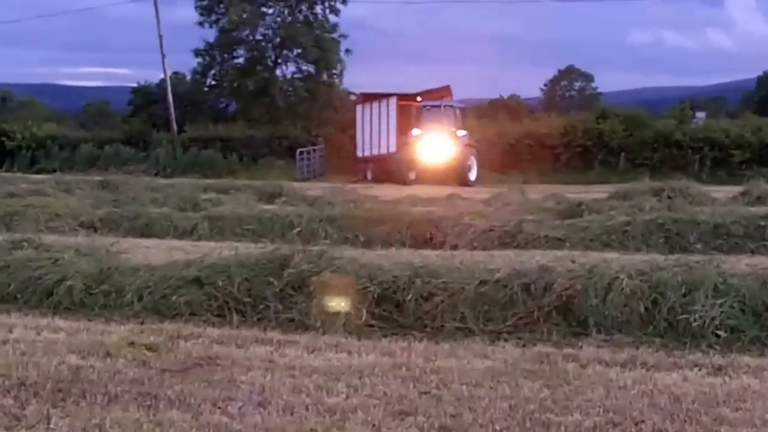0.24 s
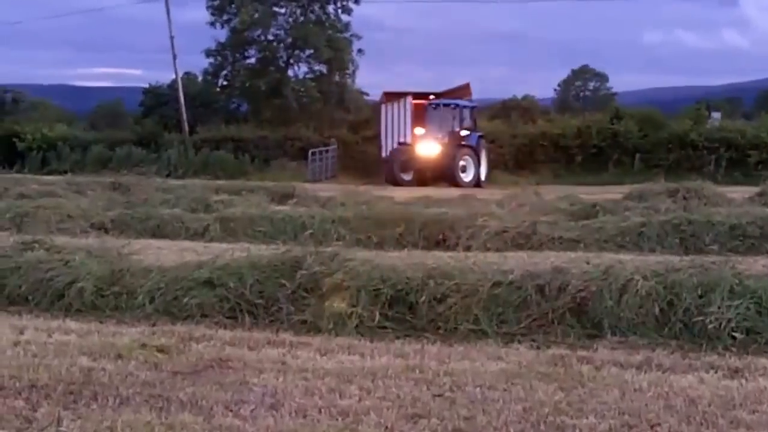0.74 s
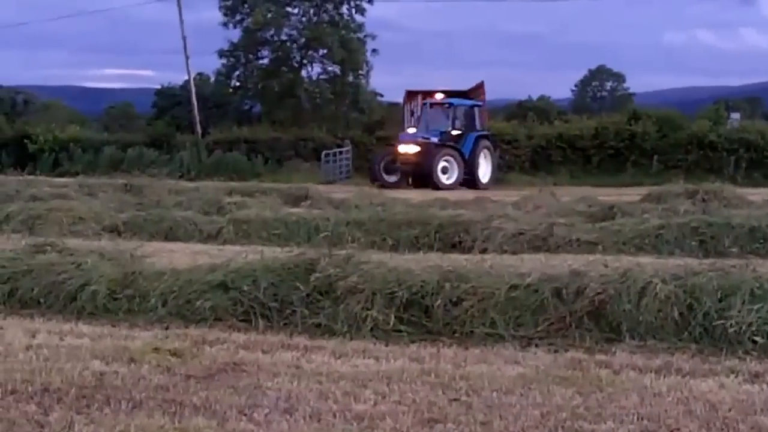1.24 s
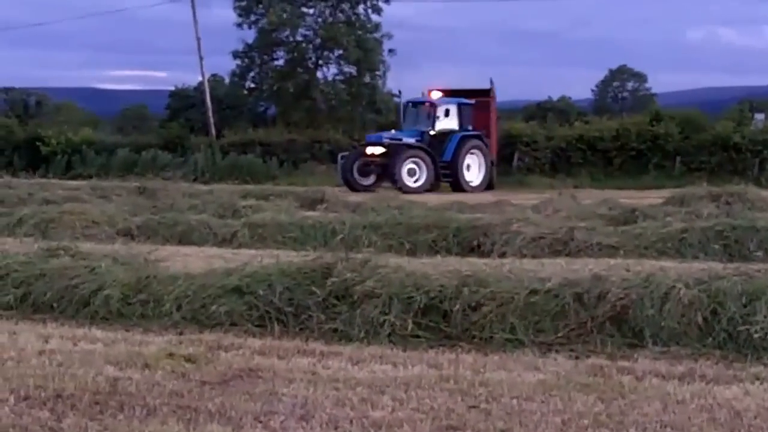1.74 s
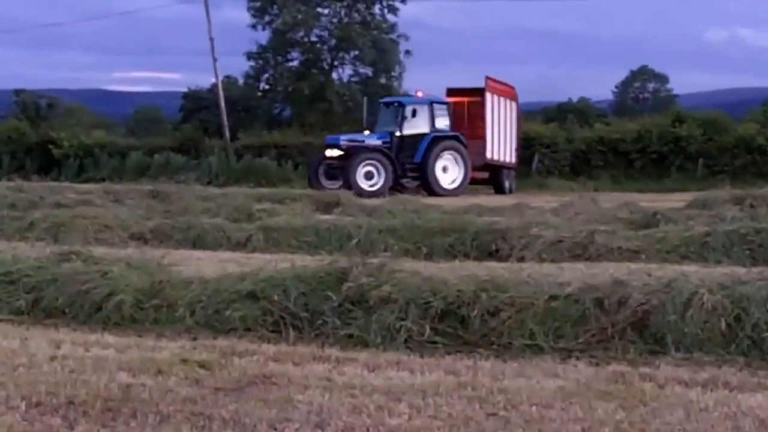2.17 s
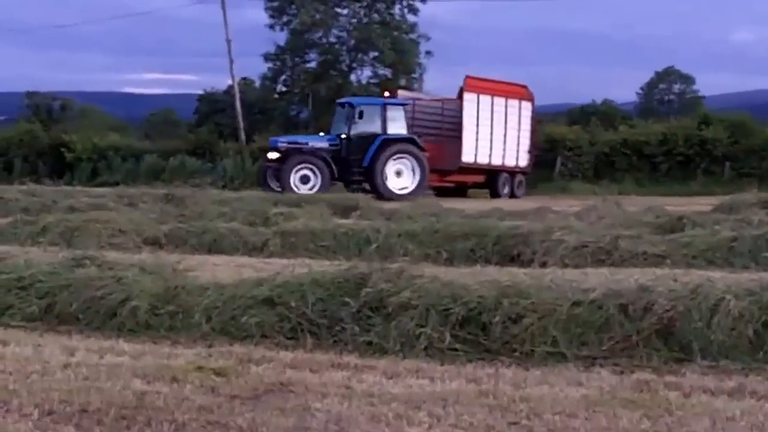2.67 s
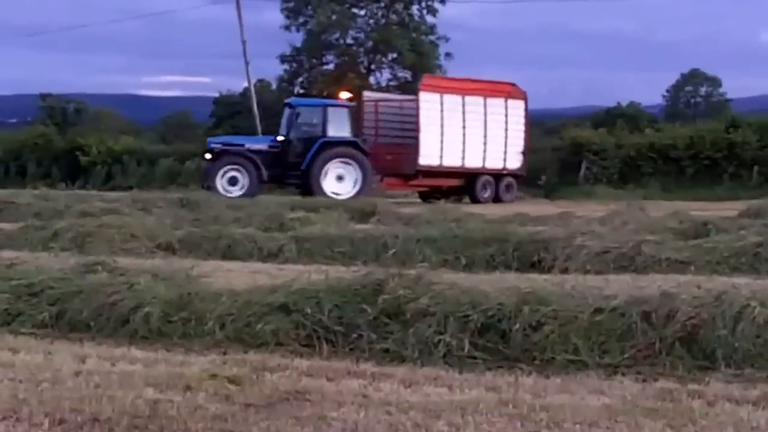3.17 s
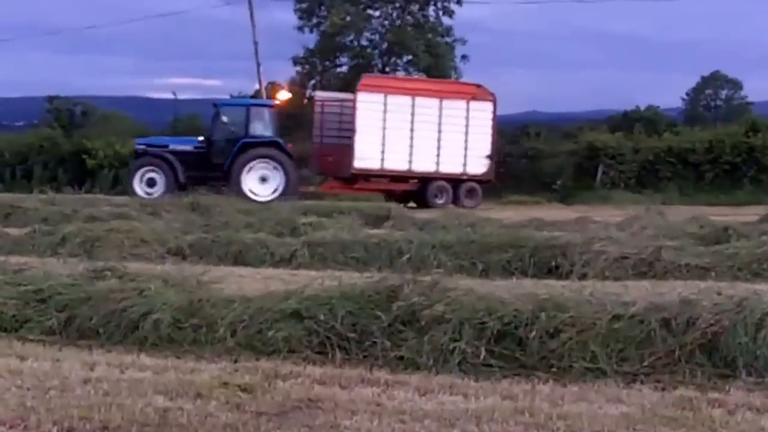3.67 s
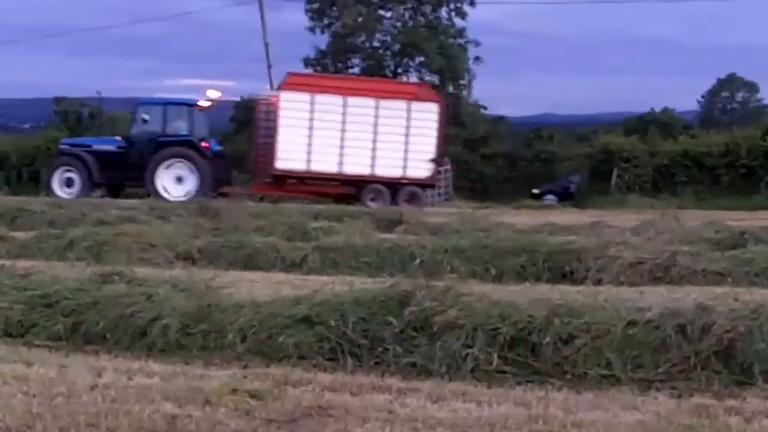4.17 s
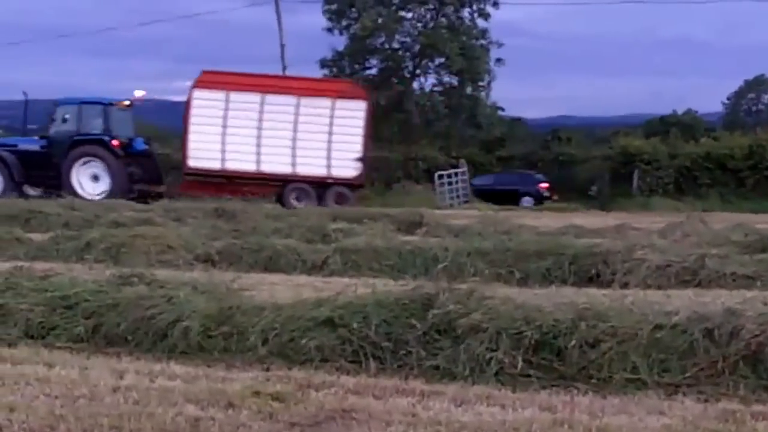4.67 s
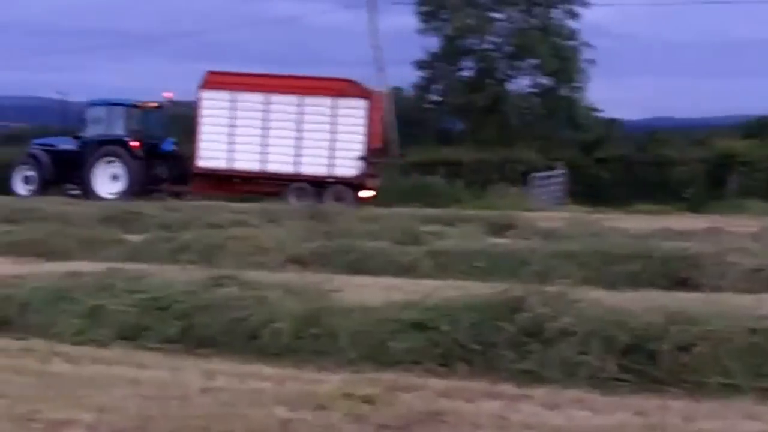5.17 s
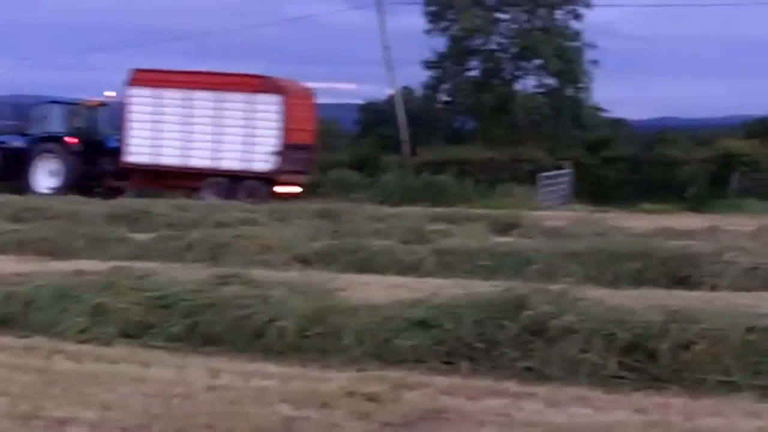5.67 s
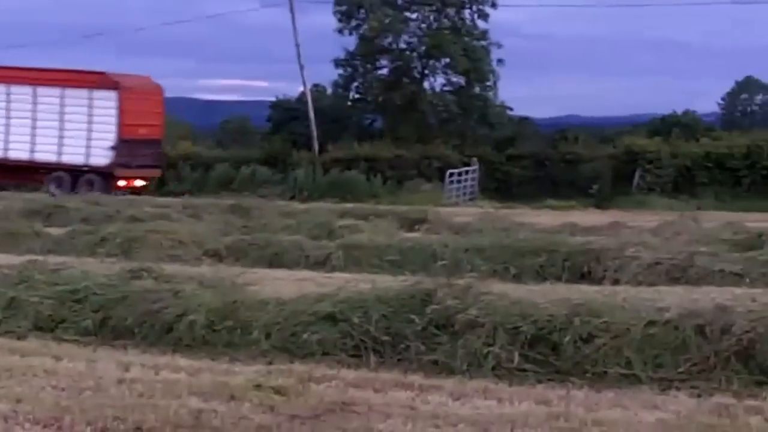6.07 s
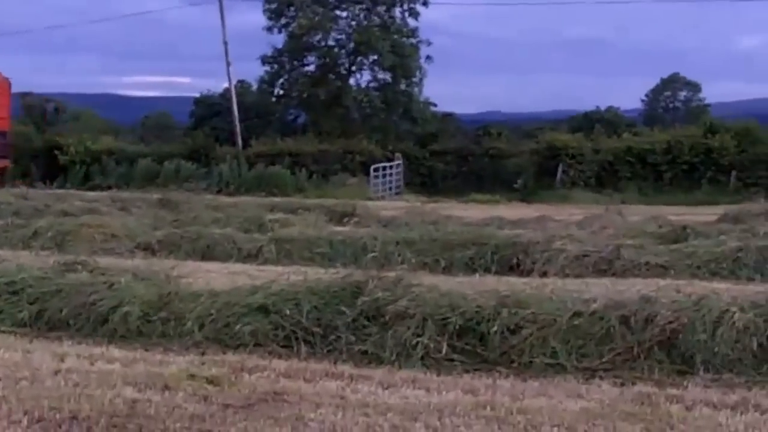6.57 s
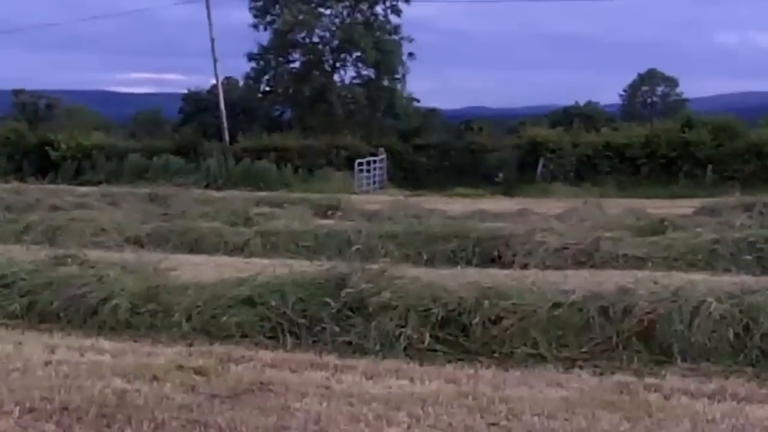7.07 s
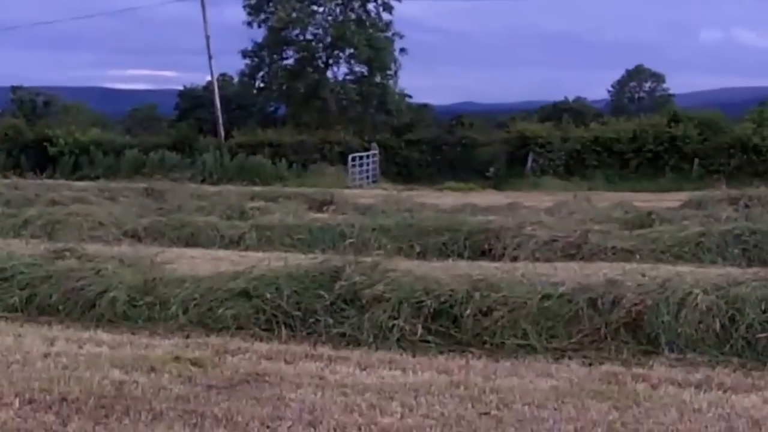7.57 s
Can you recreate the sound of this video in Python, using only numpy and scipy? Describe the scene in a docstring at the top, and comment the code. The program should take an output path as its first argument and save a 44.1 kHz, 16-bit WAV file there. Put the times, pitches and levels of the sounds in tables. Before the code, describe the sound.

A diesel tractor drives across an open field, humming and knocking as its engine speed climbs. Its empty trailer gives a few bangs and brief squeaks at first, then crashes and rattles over ruts midway and again near the end, as the engine eases into the distance. A breeze buffets the microphone throughout, with low pops and booms.

```python
"""A mown field: a six-cylinder diesel tractor turns, speeds up and pulls an empty silage trailer away.
The exhaust hums on the firing rate while the block roars and knocks. Ruts set the trailer crashing
and rattling, and its running gear squeaks. A breeze buffets the microphone, eddies pop on it, and
low booms come with some gusts and ruts. One capsule feeds both channels."""
import sys
import numpy as np
from scipy import signal
from scipy.fft import rfft, irfft, next_fast_len
from scipy.io import wavfile

SR = 44100
rng = np.random.default_rng(int(sys.argv[2]) if len(sys.argv) > 2 else 0)


def file_out(sig):
    """Save sig as 16-bit WAV at sys.argv[1]."""
    # one column per channel
    cols = np.atleast_2d(sig).T
    # limit, then scale
    lim = np.clip(cols, -1, 1)
    pcm = np.round(lim * 32767).astype(np.int16)
    wavfile.write(sys.argv[1], SR, pcm)


N = 345303

# engine speed: time_s, firing_rate_hz
ENGINE_SPEED = [(0, 40.2), (.9, 46.4), (1.5, 53.5), (2.1, 63), (2.4, 67.1), (2.7, 69.8), (3.0, 71.2),
                (3.3, 71.5), (3.9, 73.8), (4.8, 78.9), (6.3, 86.2), (7.2, 90.9), (7.83, 92.1)]
# exhaust hum as the pipe turns past and away: time_s, fundamental_db, second_db, upper_orders_db
EXHAUST_HUM = [(0, -28, -45, -54), (.6, -26, -44, -51), (1.2, -25.5, -45, -43), (2.1, -26, -48, -47),
               (2.45, -28, -45, -44), (2.85, -31, -30, -39), (3.35, -31, -29, -41), (3.85, -30, -40, -51),
               (4.05, -33, -37, -48), (4.2, -33, -33, -48), (4.35, -30, -27.5, -44), (4.55, -33, -28, -46),
               (4.68, -34, -25, -45), (4.83, -35, -27, -45), (4.92, -34, -32, -48), (5.3, -34, -33, -50),
               (5.5, -37, -39, -47), (6.3, -38, -48, -48), (6.9, -54, -52, -52), (7.83, -42, -48, -53)]
# overtones on top of the hum: firing_rate_multiple, trim_db
EXHAUST_OVERTONES = [(2.5, 3.5), (3, -2)]
# punch of each firing in one engine cycle: strength_db
CYLINDER_PUNCH = [5, 1, 7, 5.5, 9, 4]
# roar of block and driveline: time_s, level_db, treble_tilt_db_per_octave
ROAR_RIDE = [(0, -42.5, 3), (.65, -38, 2), (1.3, -42, 5), (1.7, -35.5, 2.5), (2.1, -38.5, 3),
             (2.6, -35.5, 2), (2.9, -38, 1.5), (3.5, -36, 1.5), (4.2, -35.5, 2), (4.7, -36.5, 3),
             (5.1, -38, 1.5), (5.5, -36, 2), (6.3, -38, 1), (6.7, -41.5, 1), (7.3, -41.5, 1),
             (7.83, -43, -1)]
# body of the roar, with the dips of the ground echo: frequency_hz, gain_db
ROAR_EQ = [(180, -2), (300, -6), (375, -17), (515, -15.5), (580, -8.5), (735, -0.5), (1050, -7.5),
           (1400, -1.5), (2600, -8.5), (4410, -16.5), (5040, -16.5), (5450, -21.5), (6300, -21.5),
           (7000, -26), (9100, -58), (15400, -120)]
# airy top of the roar: frequency_hz, gain_db
AIR_EQ = [(250, -42), (5500, -51), (7000, -9.5), (8000, -4), (9500, -11.5), (11500, -16), (13000, -24),
          (15000, -38)]
# that top against the body: time_s, level_db
AIR_RIDE = [(0, -32), (1.1, -32), (1.6, -27.5), (2.1, -30.5), (3.0, -29.5), (3.7, -27.5), (4.7, -28.5),
            (5.3, -30.5), (7.83, -30)]
# bonnet front, pipe, then bonnet side face the listener: time_s, tick_db, chug_db, clatter_db
KNOCK_RIDE = [(0, -50, -54, -64), (.5, -52, -52, -65), (1.0, -50, -49, -67), (1.3, -45, -51, -47),
              (1.6, -42.5, -42.5, -53), (1.9, -46.5, -41.5, -52), (2.2, -47.5, -51, -60),
              (2.6, -48.5, -53, -45), (3.2, -65, -67, -44), (3.9, -62, -64, -44), (4.7, -58, -62, -45),
              (5.1, -55, -95, -55), (6.0, -62, -50, -64), (7.83, -76, -56, -69)]
# combustion ticks, the first heard from the front too: pitch_hz, t60_s, level_db
TICK_MODES = [(3030, .023, 0), (2770, .024, -1), (4230, .02, -7), (5720, .016, -8), (6700, .008, -16)]
# the other ticks come out as the bonnet's side turns to the listener: time_s, trim_db
SIDE_TICK_RIDE = [(0, -9), (1.0, -7), (1.4, 0), (2.2, 1), (7.83, 1)]
# ticks and chugs rise as the tractor nears and fall as it turns away: time_s, pitch_ratio
DOPPLER_BEND = [(0, .955), (.8, .975), (1.3, .995), (1.6, 1.01), (1.85, 1.025), (2.1, 1.0), (2.3, .975),
                (2.6, .95), (7.83, .94)]
# broad, brighter clatter: time_s, level_db
GRIND_RIDE = [(0, -32.5), (.08, -47.5), (.6, -49), (2.0, -51), (2.6, -43.5), (3.4, -54.5), (4.0, -42),
              (4.7, -49), (5.3, -46.5), (6.0, -63), (7.83, -62)]
# breeze on the capsule between gusts: time_s, buffet_db, flutter_db
WIND_RIDE = [(0, -29, -37.5), (.4, -35, -37.5), (.75, -30.5, -37.5), (1.0, -30, -28), (1.35, -20, -29.5),
             (1.7, -23, -31.5), (2.15, -26, -27), (2.5, -27, -29.5), (2.95, -24, -31.5), (3.15, -36, -33),
             (3.8, -35, -31.5), (4.1, -30.5, -30), (4.6, -29, -29), (5.3, -24.5, -29), (5.6, -31, -30.5),
             (6.4, -25.5, -29), (7.1, -33, -30.5), (7.5, -29.5, -32.5), (7.83, -19.5, -27)]
# deep buffeting: frequency_hz, gain_db
BUFFET_EQ = [(5, -14), (10, -3), (20, -1), (40, 0), (55, -3), (72, -8), (100, -18), (200, -40),
             (1000, -130)]
# flutter above it: frequency_hz, gain_db
FLUTTER_EQ = [(50, -5), (85, -0.5), (130, -2), (200, -3.5), (260, -12), (350, -23), (500, -34.5),
              (2000, -120)]
# gusts that swell the buffeting: peak_s, boost_db
GUST_SWELLS = [(1.1, -5), (1.9, 0), (2.9, 3.5), (3.45, 11), (4.2, 3), (4.82, 4), (5.16, 0.5), (5.72, 6),
               (6.25, 0.5), (6.9, 0.5), (7.3, 8), (7.6, 10)]
# running-gear squeaks, thin tones and a faint low hum: start_s, end_s, pitch_hz, wander_hz, level_db
SQUEAK_CUES = [(0, .9, 69.6, 5.2, -41), (0, .07, 3450, 80, -54), (.39, .46, 1700, 40, -50),
               (.535, .6, 1700, 30, -41), (.545, .6, 2320, 30, -46), (.64, .7, 2320, 40, -48),
               (.63, .655, 2950, 150, -47), (.78, .9, 2960, 60, -55), (.85, .91, 1710, 40, -46),
               (.93, .99, 1680, 40, -48), (.62, .65, 1500, 40, -44), (.75, .79, 1450, 30, -45),
               (.955, .98, 4350, 200, -50), (1.2, 1.225, 4400, 250, -46), (5.95, 6.55, 2255, 25, -56),
               (6.7, 7.37, 2850, 30, -55), (7.16, 7.56, 2135, 14, -50), (7.72, 7.8, 2950, 30, -54)]
# trailer hitting ruts: start_s, crash_db, rattle_db, crash_t60_s
RUT_HITS = [(0.002, -35, -45, 0.34), (0.389, -47, -59, 0.58), (0.459, -30, -39, 0.14),
            (0.869, -41, -43.5, 0.98), (1.209, -44.5, -49, 0.86), (1.551, -37.5, -43, 1),
            (3.374, -35, -66, 0.95), (3.856, -28, -44, 0.3), (4.093, -28.5, -48, 0.35),
            (4.019, -48, -36, 0.25), (4.366, -26, -35.5, 0.24), (4.699, -33.5, -43, 0.68),
            (5.909, -38.5, -43, 0.93), (6.068, -35.5, -50, 0.59), (6.192, -34.5, -59, 0.47),
            (6.408, -24.5, -38, 0.42), (6.476, -31.5, -47, .75), (6.482, -45, -41, .25),
            (6.619, -39, -46, 0.3), (6.893, -30, -35, 0.3), (6.966, -23, -42, 0.25), (7.066, -33, -42, 0.3),
            (7.119, -35, -47, 0.3), (7.162, -34, -44, 0.25), (7.188, -45, -40, .15),
            (7.245, -36.5, -47, 0.25), (7.53, -26.5, -37, 0.5), (7.609, -43, -50, 0.34),
            (7.68, -34.5, -50, 0.19)]
# dull crash of the trailer body: frequency_hz, gain_db
CRASH_EQ = [(240, -50), (400, -10.5), (484, -4), (903, 5), (1080, -0.5), (1670, 1), (2190, -1), (2650, -7),
            (3640, -12.5), (5000, -20), (6500, -58), (11000, -120)]
# bright rattle of its panels: frequency_hz, gain_db
RATTLE_EQ = [(2000, -7), (3500, 15), (4800, 9), (6800, 6.5), (7900, -1), (9000, -14.5), (12000, -18),
             (16000, -58)]
# ring of the trailer body: pitch_hz, width_hz, gain_db
BODY_MODES = [(787, 20, 1), (930, 16, 2), (1310, 16, 1), (1410, 17, -4), (1715, 18, 1), (1860, 17, -3),
              (2220, 14, 1), (2880, 26, 0)]
# eddies bursting on the capsule: peak_s, peak_db, pitch_hz
EDDY_CUES = [(.907, -13.5, 141), (0.926, -23, 199), (0.995, -20, 118), (1.011, -9.5, 136),
             (1.032, -14, 168), (1.089, -17.5, 333), (1.094, -14, 94), (1.126, -13.5, 118),
             (1.16, -10, 133), (1.214, -13, 148), (1.293, -17.5, 179), (1.332, -14.5, 204),
             (1.375, -17, 202), (1.637, -13, 155), (1.683, -11.5, 196), (1.708, -16, 135),
             (1.858, -13, 87.5), (1.95, -13, 104), (1.966, -10, 161), (2.018, -12, 133),
             (2.062, -12.5, 139), (2.095, -11.5, 88), (2.144, -18, 180), (2.273, -21, 197),
             (7.458, -15.5, 110), (7.584, -21, 170), (7.622, -12.5, 94.5), (7.682, -20.5, 261),
             (7.721, -20, 151), (7.756, -11, 82)]
# low booms, some with gusts and some with ruts: peak_s, peak_db, pitch_hz, half_length_s
BOOM_CUES = [(1.02, -21.5, 84.8, 0.026), (1.875, -20.5, 51.34, 0.055), (1.962, -16, 45.37, 0.054),
             (3.867, -24.5, 135, 0.026), (4.011, -23, 176.4, 0.04), (4.112, -23.5, 149.4, 0.026),
             (4.376, -23, 130, 0.031), (4.83, -21, 49.6, 0.091), (5.16, -17, 46, 0.037),
             (5.685, -16, 41.66, 0.048), (5.766, -19.5, 56, 0.077), (6.437, -18, 125, 0.013)]
# faint low rumble, different in left and right: frequency_hz, gain_db
RUMBLE_EQ = [(8, -20), (25, 0), (60, -1), (125, -17), (250, -32), (340, -27), (600, -63)]
# DC bias, left then right: offset_full_scale
DC_OFFSETS = [.0353, -.0051]

CHUG_HZ, CHUG_T60_S = 768, .048   # exhaust pipe
CLATTER_HZ, CLATTER_WIDTH_HZ = 1373, 200   # side panel of the bonnet
GRIND_HZ, GRIND_WIDTH_HZ = 2124, 1240
GUST_HALF_LENGTH_S, GUST_FLUTTER_SHARE = .091, .2
LUMP_RATE_HZ, LUMP_DB = 3.2, -.5   # small chance swells in the wind
CRASH_ATTACK_S, RATTLE_ATTACK_S, RATTLE_T60_SHARE = .013, .007, .65
NOTCH_HZ, NOTCH_WIDTH_HZ, CUTOFF_HZ = 5464, 650, 15100
HISS_DB, RUMBLE_DB = -78.5, -57.5


def from_db(db):
    """Decibels to gain."""
    return 10 ** (np.asarray(db) / 20)


def rms_one(x):
    """Scale to rms 1."""
    return x / np.sqrt(np.mean(x ** 2) + 1e-20)


def ride(rows):
    """Breakpoints to automation curves, one for each column after the time."""
    times, *columns = np.transpose(rows)
    return [np.interp(np.arange(N) / SR, times, column) for column in columns]


def colour(x, eq):
    """Shape by an EQ curve; rms 1."""
    size = next_fast_len(N)
    hz, db = np.transpose(eq)
    bins_hz = np.arange(size // 2 + 1) * SR / size
    gain = from_db(np.interp(np.log(bins_hz + 1), np.log(hz), db))
    return rms_one(irfft(rfft(x, size) * gain, size)[:N])


def drift(rate_hz):
    """Slow random modulation, rms about 1: noise at every 40th sample, low-passed twice."""
    pole = np.exp(-80 * np.pi * rate_hz / SR)
    slow = signal.lfilter([1], [1, -2 * pole, pole * pole], rng.standard_normal(N // 40 + 2002))[2000:]
    return np.interp(np.arange(N) / 40, np.arange(len(slow)), rms_one(slow))


def resonance(x, hz, width_hz):
    """Two-pole band-pass, gain 1 at the peak."""
    r = np.exp(-np.pi * width_hz / SR)
    feedback = [1, -2 * r * np.cos(2 * np.pi * hz / SR), r * r]
    return signal.lfilter(np.array([1, 0, -1]) * (1 - r * r) / 2, feedback, x)


def steep_band(x, hz, width_hz):
    """The same resonance twice, for steep skirts; rms 1."""
    return rms_one(resonance(resonance(x, hz, width_hz), hz, width_hz))


def blows(count, rate_hz, hz, t60_s, uneven_db, detune=.01):
    """A damped sine struck at each whole step of count, with new strength, phase and pitch; rms 1."""
    blow = count.astype(int)
    age_s = (count - blow) / rate_hz
    strength, phase, tuning = rng.standard_normal((blow[-1] + 1, 3))[blow].T
    envelope = (1 - np.exp(-age_s / .0027)) * from_db(uneven_db * strength - 60 * age_s / t60_s)
    choke = np.clip(5 * (1 + blow - count), 0, 1)   # silent before the next blow
    tone = np.sin(2 * np.pi * hz * (1 + detune * tuning) * age_s + 3 * phase)
    return rms_one(envelope * choke * tone)


def exhaust(firings):
    """From afar only the low orders of the exhaust pulses carry, as wavering sines."""
    first_db, second_db, upper_db = ride(EXHAUST_HUM)
    orders = [(1, first_db), (2, second_db)] + [(k, upper_db + db) for k, db in EXHAUST_OVERTONES]
    return sum(np.sqrt(2) * from_db(db + drift(5)) * np.sin(2 * np.pi * k * firings + .2 * drift(4))
               for k, db in orders)


def firing_throb(firings, sharpness=2.3, uneven_db=3):
    """An envelope that swells after each firing; cylinders differ, and so do cycles; rms 1."""
    firing = firings.astype(int)
    chance_db = uneven_db * rng.standard_normal(firing[-1] + 1)[firing]
    strength = from_db(np.array(CYLINDER_PUNCH)[firing % 6] + chance_db)
    progress = firings - firing
    return rms_one(strength * np.sin(np.pi * progress) * np.exp(-sharpness * progress))


def block_roar(throb, shared_db=.5, own_db=1.21, throb_per_octave=.14):
    """Block and driveline: half-octave noise bands surge partly together, and the treble throbs."""
    level_db, tilt_db = ride(ROAR_RIDE)
    air_db, = ride(AIR_RIDE)
    together = drift(4.1)
    beds = [colour(noise, ROAR_EQ) + from_db(air_db) * colour(noise, AIR_EQ)
            for noise in rng.standard_normal((2, N))]
    edges_hz = 250 * 2 ** np.arange(0, 6.1, .5)
    out = 0
    for k, (low, high) in enumerate(zip(edges_hz, edges_hz[1:])):
        band = signal.sosfilt(signal.butter(2, [low, high], "band", fs=SR, output="sos"), beds[k % 2])
        treble_octaves = np.clip(np.log2(low / 1500), 0, 2.2)
        depth = np.clip(throb_per_octave * treble_octaves, 0, .5)
        surge_db = shared_db * (1 + .087 * treble_octaves) * together + own_db * drift(26)
        out += band * from_db(tilt_db * treble_octaves + surge_db) * (1 - depth + depth * throb)
    return from_db(level_db) * out


def diesel_knock(firings, firing_hz, throb):
    """Combustion ticks at each firing, the pipe chugs once a crank turn, a shaken panel clatters."""
    tick_db, chug_db, clatter_db = ride(KNOCK_RIDE)
    bend, = ride(DOPPLER_BEND)
    side_db, = ride(SIDE_TICK_RIDE)
    ticks = 0
    for k, (hz, t60_s, db) in enumerate(TICK_MODES):
        gain = from_db(db + side_db * (k > 0) + 1.5 * drift(6))
        ticks += gain * blows(firings, firing_hz, hz * bend, t60_s, uneven_db=3.5)
    chugs = blows(firings / 3, firing_hz / 3, CHUG_HZ * bend, CHUG_T60_S, uneven_db=3)
    clatter = steep_band(throb * rng.standard_normal(N), CLATTER_HZ, CLATTER_WIDTH_HZ)
    return from_db(tick_db) * ticks + from_db(chug_db) * chugs + from_db(clatter_db) * clatter


def grind():
    """A broad, bright band of flickering noise, perhaps the driveline."""
    level_db, = ride(GRIND_RIDE)
    gain = from_db(level_db + 2 * drift(13))
    return gain * steep_band(rng.standard_normal(N), GRIND_HZ, GRIND_WIDTH_HZ)


def wind():
    """Breeze on the capsule: lumpy low buffeting and faster flutter, both lifted by gusts."""
    buffet_db, flutter_db = ride(WIND_RIDE)
    t = np.arange(N) / SR
    swell_db = sum(db * np.exp(-((t - peak_s) / GUST_HALF_LENGTH_S) ** 2) for peak_s, db in GUST_SWELLS)
    swell_db += LUMP_DB * drift(LUMP_RATE_HZ)
    buffet = from_db(buffet_db + swell_db) * colour(rng.standard_normal(N), BUFFET_EQ)
    flutter_gain = from_db(flutter_db + GUST_FLUTTER_SHARE * swell_db + drift(21))
    return buffet + flutter_gain * colour(rng.standard_normal(N), FLUTTER_EQ)


def squeaks():
    """Running-gear squeaks and a faint low hum: sines that wander in pitch and flicker in level."""
    out, t = 0, np.arange(N) / SR
    for start_s, end_s, hz, wander_hz, db in SQUEAK_CUES:
        gain = np.sqrt(2) * from_db(db + 2.5 * drift(30))
        cycles = np.cumsum(hz + wander_hz / 2 * drift(40)) / SR
        fade = np.clip(np.minimum(t - start_s, end_s - t) / .01, 0, 1)
        out += gain * fade * np.sin(2 * np.pi * cycles)
    return out


def trailer():
    """Each rut sets off a dull, ringing crash of the body and a shorter bright rattle of panels."""
    crash_env, rattle_env = np.zeros((2, N))
    for start_s, crash_db, rattle_db, t60_s in RUT_HITS:
        start = round(start_s * SR)
        t = np.arange(min(N - start, SR)) / SR
        fall_db = -60 * t / t60_s
        crash_env[start:][:SR] += from_db(crash_db + fall_db) * (1 - np.exp(-t / CRASH_ATTACK_S))
        rattle_tail = from_db(rattle_db + fall_db / RATTLE_T60_SHARE)
        rattle_env[start:][:SR] += rattle_tail * (1 - np.exp(-t / RATTLE_ATTACK_S))
    chatter = from_db(1.2 * drift(60))   # loose parts strike one after another
    crash = chatter * crash_env * colour(rng.standard_normal(N), CRASH_EQ)
    clang = sum(from_db(db) * resonance(crash, hz, width_hz) for hz, width_hz, db in BODY_MODES)
    rattle = chatter * rattle_env * colour(rng.standard_normal(N), RATTLE_EQ)
    return crash + clang + rattle


def eddy_pops():
    """Single eddies burst on the capsule as one-cycle thuds."""
    out, t = np.zeros(N), np.arange(-800, 800) / SR
    for peak_s, db, hz in EDDY_CUES:
        phase = np.pi * hz * t
        thud = (1 - 2 * phase ** 2) * np.exp(-phase ** 2)
        out[round(peak_s * SR) - 800:][:len(t)] += from_db(db) * thud
    return out


def booms():
    """Weight under gusts and ruts: a few cycles of a low wavering tone in a bell-shaped swell."""
    out, t = 0, np.arange(N) / SR
    for peak_s, db, hz, half_length_s in BOOM_CUES:
        swell = from_db(db) * np.exp(-((t - peak_s) / half_length_s) ** 2)
        out += swell * np.sin(2 * np.pi * hz * t + drift(9.7))
    return out


def scene():
    """Tractor, trailer and wind meet at one capsule, sent to both channels."""
    firing_hz, = ride(ENGINE_SPEED)
    firings = np.cumsum(firing_hz) / SR   # running count that keeps the engine layers in step
    throb = firing_throb(firings)
    tractor = block_roar(throb) + diesel_knock(firings, firing_hz, throb) + grind() + exhaust(firings)
    mix = tractor + trailer() + squeaks() + booms() + wind() + eddy_pops()
    return np.tile(mix, (2, 1))


def record(dry):
    """Capsule cavity notch; faint hiss, low rumble and bias, different left and right; steep top cut."""
    notched = signal.lfilter(*signal.iirnotch(NOTCH_HZ, NOTCH_HZ / NOTCH_WIDTH_HZ, SR), dry)
    hiss = signal.sosfilt(signal.butter(4, 9500, "high", fs=SR, output="sos"), rng.standard_normal((2, N)))
    rumble = np.array([colour(noise, RUMBLE_EQ) for noise in rng.standard_normal((2, N))])
    heard = notched + from_db(HISS_DB) * hiss + from_db(RUMBLE_DB) * rumble + np.c_[DC_OFFSETS]
    return signal.sosfilt(signal.cheby2(20, 50, CUTOFF_HZ, fs=SR, output="sos"), heard)


dry = scene()
out = record(dry)
file_out(out)
```